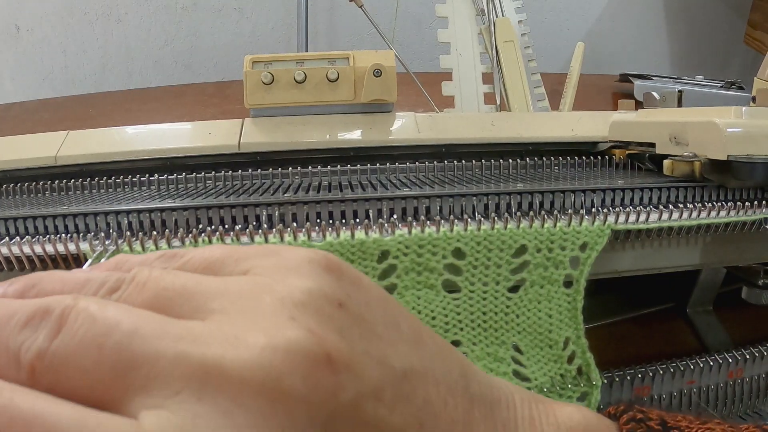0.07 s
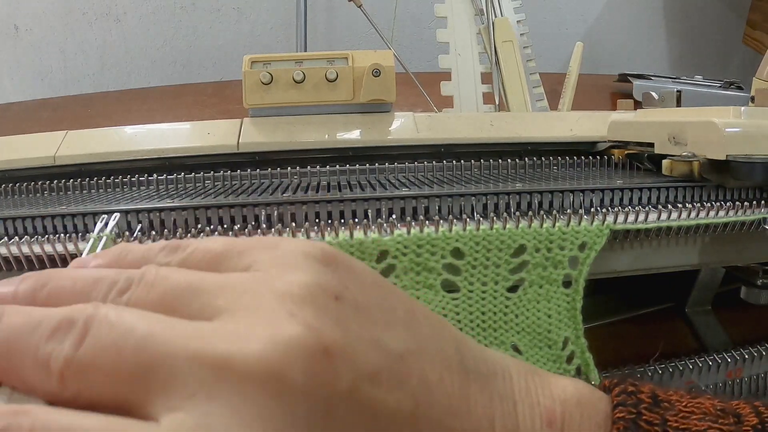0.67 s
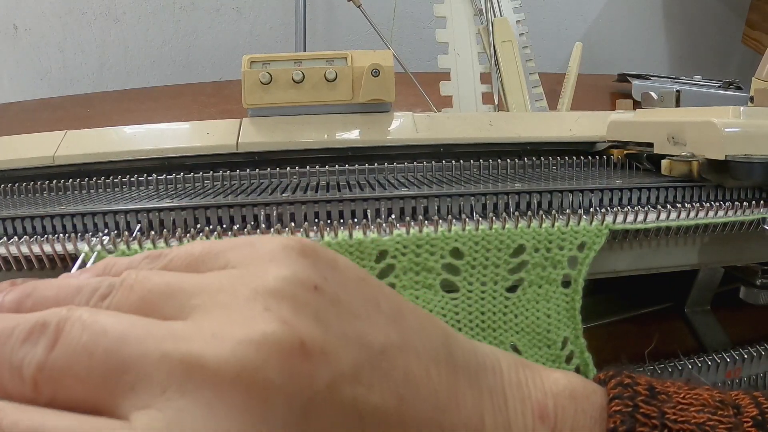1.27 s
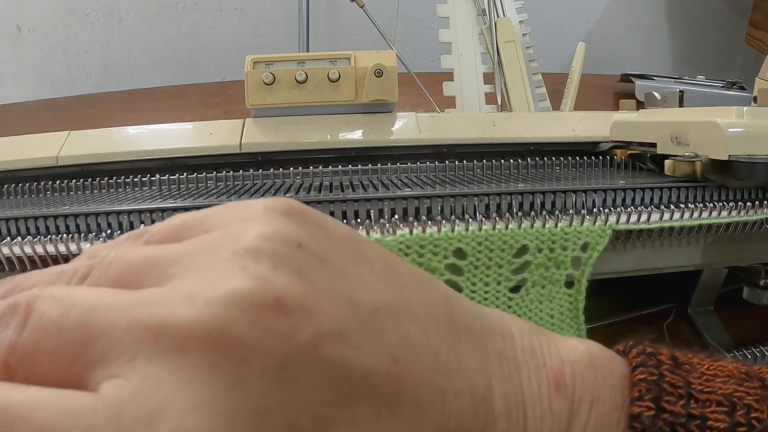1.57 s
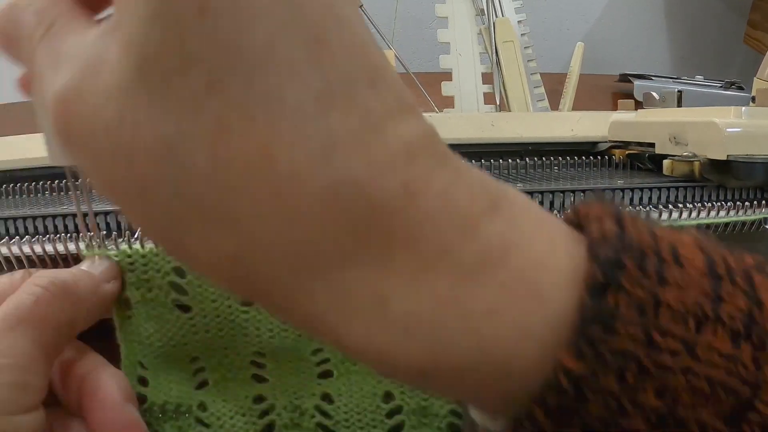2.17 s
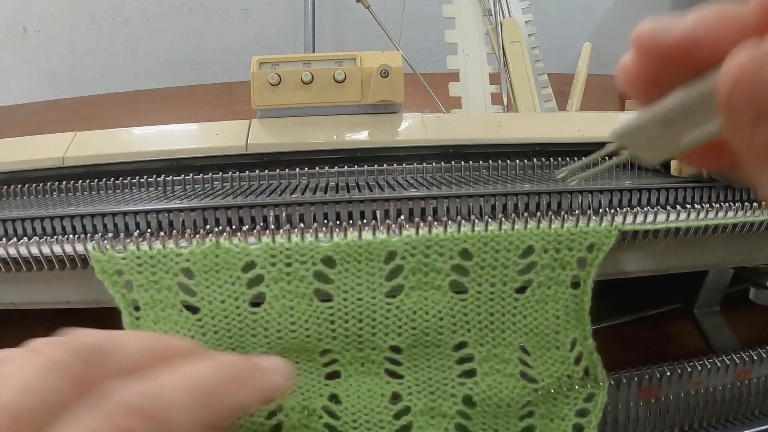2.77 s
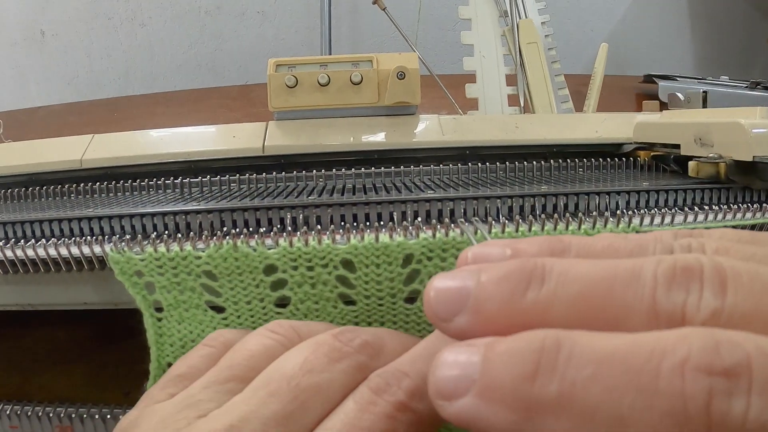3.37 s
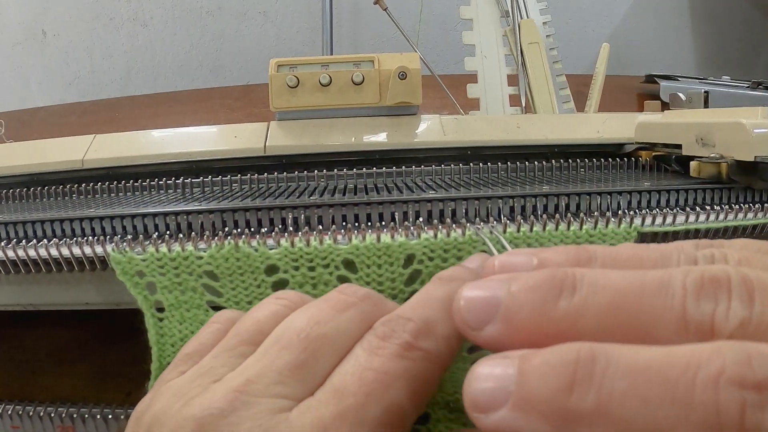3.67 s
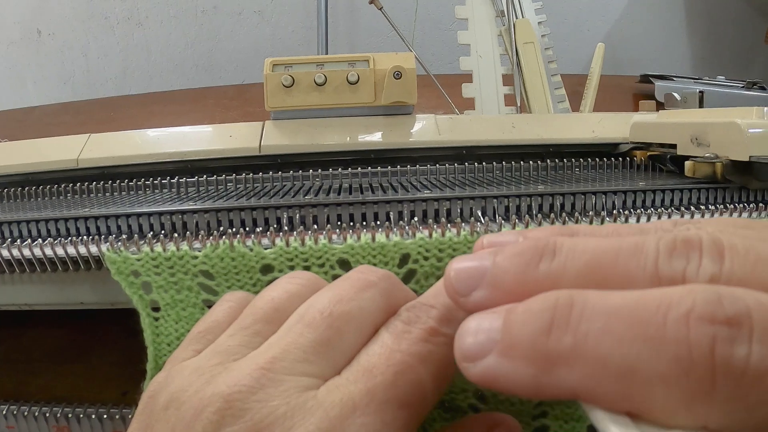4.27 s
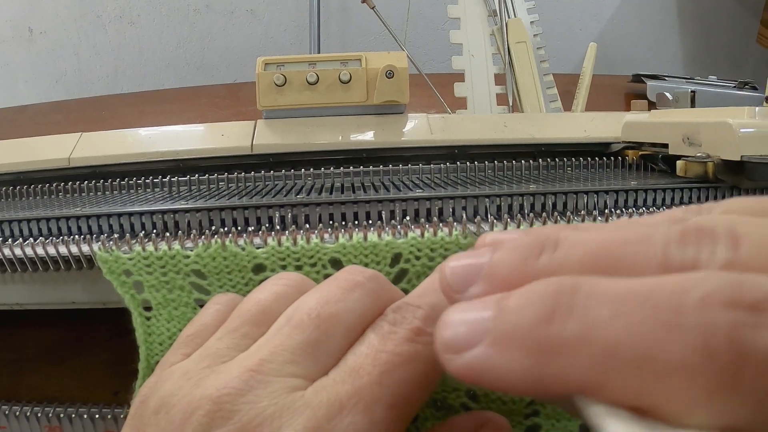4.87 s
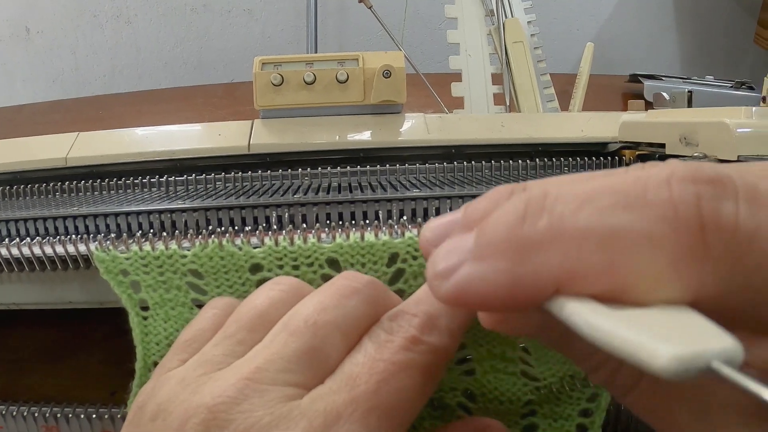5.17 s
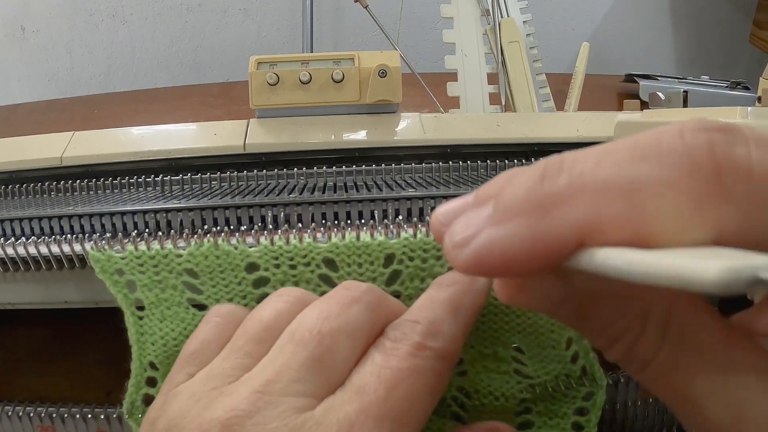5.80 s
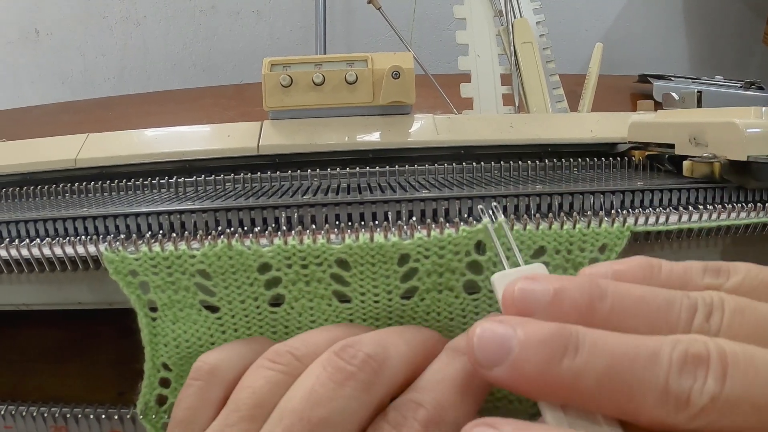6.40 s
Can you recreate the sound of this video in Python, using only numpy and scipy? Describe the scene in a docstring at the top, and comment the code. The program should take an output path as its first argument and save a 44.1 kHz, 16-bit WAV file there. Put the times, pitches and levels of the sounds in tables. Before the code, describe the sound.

Light, irregular metal clicks and ticks as a hand tool moves stitches on a knitting machine's needles, over a faint room hum.

```python
"""In a small quiet room, close to a stereo microphone, stitches are moved by hand on a flat-bed
knitting machine. Impacts excite free vibration: the transfer tool clicks against needles, latches flick
over, needles knock against their stops, and the steel bed rings briefly. In between, friction of yarn
and needle shanks makes a hiss, hands brush the knitting and bump the frame, and a low hum fills the room."""
import sys
import numpy as np
from scipy import signal
from scipy.fft import rfft, irfft, next_fast_len
from scipy.io import wavfile

SR = 44100
rng = np.random.default_rng(int(sys.argv[2]) if len(sys.argv) > 2 else 0)


def persist_wave(psi):
    """Save psi, clipped to +-1, as 16-bit WAV."""
    counts = np.round(np.clip(psi, -1, 1) * 32767).astype(np.int16)
    wavfile.write(sys.argv[1], SR, np.atleast_2d(counts).T)


N = 283915
TIME = np.arange(N) / SR

# spectrum of the room's air noise: f/Hz, gain/dB
AIR_SPECTRUM = [(20, -14.5), (45, -9.5), (70, -16), (105, -20), (150, -1.5), (190, 4), (260, -7),
                (420, -15.5), (780, -25.5), (1200, -17.5), (2000, -22.5), (2900, -32), (7500, -35),
                (9000, -45.5), (16000, -50)]
# partials of the hum: f/Hz, rms level/dB
HUM_PARTIALS = [(193.7, -71.5), (431, -85.5)]
# envelope of a low drone: t/s, level/dB
DRONE_ENVELOPE = [(0, -98), (2.1, -79), (2.8, -72), (4.1, -68), (4.5, -88.5), (5.5, -67), (6.44, -72.5)]
# hands bumping the machine: t/s, level/dB, f/Hz, T60/s
BUMPS = [(0.335,-54,42.4,.4), (0.495,-46.5,148,0.4), (1.891,-49.5,46,0.15), (2.389,-40.5,155.5,0.24),
         (2.663,-39,166,0.053), (3.418,-53.5,302,0.17), (4.836,-48.5,305,0.21), (5.216,-43,66,0.12),
         (5.296,-43,28.4,0.17)]
# hand and sleeve brushing the knitting: t/s, duration/s, level/dB
BRUSHES = [(.32, 0.084, -53.5), (2.13, 0.3, -70), (2.305, 0.049, -54.5), (2.385, 0.062, -49.5),
           (4.7, 0.058, -69.5), (5.04, 0.047, -59), (5.21, 0.055, -65.5)]
# spectrum of skin on wool: f/Hz, gain/dB
BRUSH_SPECTRUM = [(100, -23), (280, 9.5), (520, 10.5), (850, 5), (1500, 4), (2500, -15.5), (6000, -32),
                  (16000, -53)]
# needles pushed along their slots: t/s, duration/s, level/dB
SLIDES = [(0.078,0.054,-62), (0.278,.03,-63), (0.442,0.1,-65), (0.669,0.088,-64), (0.801,0.16,-71),
          (1.064,0.056,-54.5), (1.679,0.28,-68), (2.093,0.24,-68), (3.18,.11,-78.5), (4.15,.12,-68.5),
          (4.962,0.069,-57.5), (5.123,0.034,-54), (5.588,0.051,-64), (5.765,0.1,-59.5), (5.986,0.034,-55)]
# spectrum of sliding friction: f/Hz, gain/dB
RUB_SPECTRUM = [(150, -2.5), (400, -9.5), (750, -16.5), (1300, 1.5), (2000, -1), (3500, -2), (6000, 2),
                (7600, -1.5), (8800, -12.5), (13000, -19), (16000, -30)]
# needles slipping off the tool: t/s, level/dB, T60/s
PINGS = [(1.071,-57.5,0.44), (1.215,-71.5,0.6), (2.414,-47.5,0.27), (2.653,-77,0.82), (4.182,-65.5,0.54),
         (4.835,-46,0.4)]
# response of the needle bed: f/Hz, gain/dB
BED_SPECTRUM = [(150, -13), (300, -3.5), (500, -6), (780, -7.5), (1150, 3.5), (1550, -3.5), (1850, -9),
                (3300, -1.5), (4800, -7), (7400, -10), (8800, -14.5), (12400, -14.5), (16000, -26)]
# decay of the bed by band: f/Hz, T60/s
BED_DECAY = [(150, 0.96), (1100, 0.26), (3400, 0.29), (7000, 0.37), (15000, 0.061)]
# latches flicking over: t/s, relative level/dB
LATCHES = [(0.1057,-54.5), (0.7104,-48), (0.7268,-53.5), (0.8136,-56), (0.896,-57.5), (1.06,-42),
           (1.095,-50.5), (1.2161,-42.5), (1.3013,-47.5), (1.3694,-45.5), (1.7331,-46), (1.785,-42),
           (1.872,-45.5), (2.3082,-44), (4.158,-56), (4.786,-51.5)]
# needles hitting their stops: t/s, relative levels of clack/dB, low modes/dB and bed/dB, contact time/s
KNOCKS = [(0.516, -29.5, -33, -33.5, 0.0011), (0.6263, -35.5, -41, -40.5, 0.0031),
          (5.9717, -34, -35, -35.5, 0.0026), (6.1143, -33.5, -44.5, -34.5, 0.0022),
          (6.2345, -37, -42, -42, 0.003), (6.2424, -34.5, -61, -38, 0.0015)]
# spectrum of a needle on its stop: f/Hz, gain/dB
CLACK_SPECTRUM = [(300, -32.5), (1200, -33), (1900, -12), (2700, -2.5), (3400, 10), (4800, -4.5),
                  (7300, -2.5), (8800, -24.5), (12000, -12), (16000, -100)]
# low and high modes of the knocked bed: f/Hz, relative level/dB, T60/s
LOW_BED_MODES = [(1070, -8, 0.058), (1096, 23.5, 0.19), (1050, 18.5, 0.1), (1080, -14, 0.23),
                 (1230, 7, 0.26), (1360, -16, 0.15), (1594, 1, .14)]
HIGH_BED_MODES = [(2340, -4.5, 0.091), (2600, -4, 0.25), (2950, -10, 0.15), (3084, 12, 0.041),
                  (3255, -9, 0.42), (3305, 1.5, 0.2), (4000, -22, 0.072), (5706, -13, .2),
                  (7630, -42.5, 0.276)]
# tool striking needles: t/s, f/Hz, relative level/dB, share passed to the bed/dB, contact time/s
CLICKS = [(.0365,5860,-47,-11.5,0.0015), (0.3178,6280,-31,-5,0.0017), (.3418,6600,-32.5,-21,0.0028),
          (0.4185,6130,-48,-1.5,0.001), (.4301,4006,-37,2,0.0014), (.4728,6200,-26,-10,0.00088),
          (2.386,5790,-35,0,.0013), (2.3994,7520,-29.5,-23.5,0.00086), (2.412,5000,-28,-22,.001),
          (3.9735,4496,-47.5,-15.5,0.00099), (4.0367,6070,-42,-18,0.00045), (4.1843,5280,-39.5,-17,0.00043),
          (4.3,5470,-43,-5,0.0047), (4.4392,5460,-48,-9,0.0016), (4.644,5620,-45,-8,0.005),
          (4.8333,5270,-42,-4,0.0011), (5.028,5500,-46,4,0.0015), (5.0422,5520,-32,-7,0.002),
          (5.0673,3740,-46.5,-28,0.0031), (5.1587,3950,-50.5,2,0.00091), (5.211,5400,-43,-4.5,0.0012),
          (5.5207,6360,-52.5,4.5,0.0022), (5.6416,6040,-46.5,0.5,.0029), (5.763,6200,-49.5,-5,0.00025),
          (5.7893,4760,-49.5,0.5,.0023), (5.8422,3570,-54.5,7,.0011), (5.8794,4120,-29,-10.5,0.0033),
          (6.0773,4270,-53.5,-3,.003), (6.2083,3360,-43.5,-12,0.004)]
# spectrum of a sharp steel contact: f/Hz, gain/dB
CRACK_SPECTRUM = [(200, -5.5), (1000, -10), (2000, 1), (3500, 5), (7500, 7), (9000, -4.5), (12500, -3.5),
                  (15000, -5), (16500, -15.5)]
# where the tool works: t/s, left minus right level/dB, lag of the left side/ms
TOOL_PATH = [(0, -.8, 0), (1.3, -1.3, .01), (2.4, .3, .01), (3.4, -2.5, .05), (4.2, -5.5, .06),
             (5.1, -4, .06), (6.0, -2.5, .045), (6.44, -1.3, .045)]

CONTACT_S = .005  # impact levels are energy spread over this time
SIDE_DB = -8  # weak side signal: the bed lies in front of both microphones
CUTOFF_HZ = 16300


def from_db(db):
    """Amplitude ratio of a level in decibels."""
    return 10 ** (np.asarray(db) / 20)


def rms_one(x):
    """Normalisation to unit mean power."""
    return x / np.sqrt(np.mean(x ** 2) + 1e-20)


def at_level(x, db):
    """Equal energy: each channel matches a burst of this level lasting CONTACT_S."""
    return x * from_db(db) * np.sqrt(CONTACT_S * SR / (np.sum(x ** 2, axis=-1, keepdims=True) + 1e-20))


def at_hz(points, hz):
    """Interpolation on a logarithmic frequency axis."""
    f, value = np.transpose(points)
    return np.interp(np.log(np.maximum(hz, 1)), np.log(f), value)


def add(out, s, sound):
    """Superposition of a sound from time s."""
    i = max(int(round(s * SR)), 0)
    out[..., i:i + sound.shape[-1]] += sound[..., :N - i]


def colour(x, spectrum, ripple_db=0, spacing_hz=100):
    """Minimum-phase filtering; random ripple stands for the peaks and gaps of a body's many modes."""
    size = next_fast_len(x.shape[-1] + 2048, real=True)
    hz = np.arange(size // 2 + 1) * SR / size
    ripple = np.interp(hz / spacing_hz, np.arange(1024), rng.standard_normal(1024))
    gain = from_db(at_hz(spectrum, hz) + ripple_db * np.clip(ripple, -2, 2))
    cepstrum = irfft(np.log(gain), size)
    cepstrum[1:size // 2] *= 2  # folding makes the filter causal
    cepstrum[size // 2 + 1:] = 0
    return irfft(rfft(x, size) * np.exp(rfft(cepstrum)), size)[..., :x.shape[-1]]


def resonate(x, hz, *widths_hz):
    """Damped resonators in series, one per bandwidth, each with unit peak gain."""
    for width_hz in widths_hz:
        r = np.exp(-np.pi * width_hz / SR)
        feedback = [1, -2 * r * np.cos(2 * np.pi * hz / SR), r * r]
        x = signal.lfilter(np.array([1, 0, -1]) * (1 - r * r) / 2, feedback, x + 1e-18)
    return x


def stereo_noise(size, side_db):
    """Partial coherence: a shared noise plus one of opposite sign on the two sides."""
    mid, side = rng.standard_normal((2, size))
    return rms_one(mid + from_db(side_db) * side * [[1], [-1]])


def drift(rate_hz):
    """Slow random modulation of unit rms."""
    knots = rng.standard_normal(8192)
    return rms_one(np.interp(TIME * rate_hz, np.arange(len(knots)), knots))


def strokes(table):
    """Amplitude envelope that rises and falls smoothly in each stroke."""
    envelope = np.zeros(N)
    for s, length_s, db in table:
        add(envelope, s, from_db(db) * signal.windows.tukey(max(int(length_s * SR), 2), .5))
    return envelope


def contact(length_s, side_db, size=1536):
    """Contact chatter of steel on steel: a rough burst that swells and dies within milliseconds."""
    t = TIME[:size] / max(length_s, 1e-4)
    return stereo_noise(size, side_db) * t * np.exp(-1.7 * t)


def ring(modes, spread_rad, size):
    """Free vibration: a sum of decaying modes whose strengths and phases vary from blow to blow."""
    t, out = TIME[:size], 0
    for hz, db, t60 in modes:
        phase = 2 * np.pi * rng.random() + spread_rad * rng.standard_normal((2, 1))
        envelope = from_db(db + rng.normal(0, 2.3) - 60 * t / t60)
        out = out + envelope * np.sin(2 * np.pi * hz * t + phase)
    return out * (1 - np.exp(-t / 0.00059))


def room_tone(low_db, high_db, split_hz, drone_hz):
    """Ambient noise: steady broadband air, a modulated hum and a narrowband drone that comes and goes."""
    low = signal.sosfilt(signal.butter(2, split_hz, fs=SR, output="sos"), stereo_noise(N, -3.5))
    high = signal.sosfilt(signal.butter(2, split_hz, "high", fs=SR, output="sos"), stereo_noise(N, 0))
    air = from_db(low_db) * rms_one(colour(low, AIR_SPECTRUM))
    air += from_db(high_db) * rms_one(colour(high, AIR_SPECTRUM))
    hum = sum(from_db(db + 2 * drift(1.7)) * np.sin(2 * np.pi * hz * TIME + .5 * drift(5.8))
              for hz, db in HUM_PARTIALS)
    drone = rms_one(resonate(stereo_noise(N, side_db=-3), drone_hz, 22, 45))
    return air + np.sqrt(2) * hum + from_db(np.interp(TIME, *np.transpose(DRONE_ENVELOPE))) * drone


def bumps(spread_rad, roughness, size=16384):
    """Damped low modes of frame and table thud, reaching the two sides with a phase difference."""
    out, t = np.zeros((2, N)), TIME[:size]
    for s, db, hz, t60 in BUMPS:
        tone = np.sin(2 * np.pi * hz * t + spread_rad * np.array([[.5], [-.5]]))
        rumble = rms_one(resonate(stereo_noise(size, side_db=-3), hz, hz / 2))
        envelope = from_db(db - 60 * t / t60) * (1 - np.exp(-t * hz * 2))
        add(out, s, envelope * (tone + roughness * rumble))
    return out


def brushes():
    """Soft friction of skin and wool gives a dull rustle."""
    return strokes(BRUSHES) * rms_one(colour(stereo_noise(N, side_db=-12), BRUSH_SPECTRUM))


def slides(grains_per_s, grain_db, hiss_db, idle_db, lead_db, lead_s):
    """Sliding friction is a stream of tiny catches over a soft hiss."""
    # a faint, brief hiss leads into each click, tick and knock
    lead_ins = [(s - 0.78 * lead_s, lead_s, db + lead_db) for s, _, db, *_ in CLICKS]
    lead_ins += [(s - 0.55 * lead_s, lead_s, db + lead_db) for s, db, *_ in LATCHES + KNOCKS]
    # the tool rubs around each click, as hard as it bears on the bed
    rubs = [(s - 0.011, 0.046, db + share_db - 15) for s, _, db, share_db, _ in CLICKS]
    envelope = from_db(idle_db) + strokes(SLIDES + rubs + lead_ins)
    grains = (rng.random(N) < grains_per_s / SR) * from_db(grain_db * np.minimum(rng.exponential(1, N), 3))
    friction = rms_one(grains * stereo_noise(N, side_db=2))
    friction += from_db(hiss_db) * stereo_noise(N, side_db=-7)
    return envelope * rms_one(colour(friction, RUB_SPECTRUM))


def pings(hz, beat_hz, overtone_ratio, overtone_db):
    """A freed needle, damped by yarn, beats in two close bending modes under a faint higher one."""
    out = np.zeros((2, N))
    for s, db, t60 in PINGS:
        modes = [(hz, 0, t60), (hz + beat_hz, -4, t60 / 2), (hz * overtone_ratio, overtone_db, t60 / 2)]
        add(out, s, from_db(db) * ring(modes, spread_rad=.4, size=32768))
    return out


def bed_ring(early_db, early_s, size=14336):
    """Dense modes of bed and room decay like noise: a quick early fall, then a tail dying band by band."""
    t, tail = TIME[:size], 0
    spectrum = rfft(stereo_noise(size, SIDE_DB))
    hz = np.arange(size // 2 + 1) * SR / size
    centres, decays = np.transpose(BED_DECAY)
    for weights, t60 in zip(np.eye(len(centres)), decays):
        band = irfft(spectrum * at_hz(np.c_[centres, weights], hz) * (hz > 100))
        tail = tail + band * from_db(-60 * t / t60)
    envelope = (1 + from_db(early_db) * np.exp(-t / early_s)) * (1 - np.exp(-t / 0.0003))
    return colour(tail * envelope, BED_SPECTRUM, ripple_db=3.5, spacing_hz=75)


def bed_clusters(modes, relative_width, size=14336):
    """Mode splitting: the coupled needles turn each mode of the bed into a narrow, beating cluster."""
    t, shake, out = TIME[:size], stereo_noise(size, SIDE_DB), 0
    for hz, db, t60 in modes:
        cluster = rms_one(resonate(shake, hz, relative_width * hz, 3 * relative_width * hz))
        out = out + cluster * from_db(db + rng.normal(0, 0.91) - 60 * t / t60)
    return out


def trembles(from_s, to_s, per_s, hz, db):
    """Loose latches rattle at random while stitches are lifted: rows of t/s, f/Hz, relative level/dB."""
    moments = np.arange(from_s, to_s, 1 / per_s)
    return [(s + jitter / per_s / 2, hz * np.exp(0.12 * pitch), db + 4.5 * force)
            for s, (jitter, pitch, force) in zip(moments, rng.standard_normal((64, 3)))]


def latches(ring_hz, width_hz, ring_db, upper_hz, upper_db, crack_db, bed_db):
    """Impulse response: a latch snaps shut into a heavily damped ring, then rebounds once, faintly."""
    out, blow = np.zeros((2, N)), signal.unit_impulse(1536)
    # the latches are alike, so their pitch spreads little
    flicks = [(s, ring_hz * np.exp(.03 * rng.standard_normal()), db) for s, db in LATCHES]
    rebounds = [(s + .025 * rng.uniform(.7, 2.1), hz * 1.11, db - 19.5) for s, hz, db in flicks]
    for s, hz, db in flicks + rebounds + trembles(from_s=.8, to_s=2.5, per_s=5.5, hz=6700, db=-66):
        tick = at_level(resonate(blow, hz, width_hz, 0.28 * width_hz), db + ring_db)
        upper = at_level(resonate(blow, upper_hz, width_hz, width_hz), db + upper_db)
        crack = at_level(colour(contact(0.0043, side_db=0), CRACK_SPECTRUM), db + crack_db)
        add(out, s, tick + upper + crack)
        add(out, s, at_level(bed_ring(early_db=4.5, early_s=0.0041), db + bed_db))
    return out


def knocks(clack_db, low_db, high_db, bed_db, bounce_s, bounce_db):
    """Inelastic impact: a needle butt hits its stop, bounces once and excites the bed's main modes."""
    out = np.zeros((2, N))
    for s, clack_level, low_level, bed_level, length_s in KNOCKS:
        for delay_s, db in [(0, clack_db), (bounce_s, clack_db + bounce_db)]:
            clack = colour(contact(length_s, SIDE_DB), CLACK_SPECTRUM, ripple_db=8, spacing_hz=285)
            add(out, s + delay_s, at_level(clack, clack_level + db))
        add(out, s, at_level(bed_clusters(LOW_BED_MODES, relative_width=0.084), low_level + low_db))
        add(out, s, at_level(bed_clusters(HIGH_BED_MODES, relative_width=0.056), bed_level + high_db))
        add(out, s, at_level(bed_ring(early_db=0.5, early_s=0.019), bed_level + bed_db))
    return out


def skim(start_s=3.4155, step_s=.0765, hz=4230, db=-56.5, loss_db=1.6, share_db=-2, contact_s=.001):
    """Periodic impacts, each weaker, as the tool skims five needles: rows as in CLICKS."""
    return [(start_s + k * step_s, hz, db - k * loss_db, share_db, contact_s) for k in range(5)]


def catches(per_s=20, hz=5300, share_db=-11, contact_s=.0007):
    """Random impacts as the sliding tool catches on needles: rows as in CLICKS."""
    rows = []
    for s, length_s, db in SLIDES:
        when = rng.random(16)
        pitch, force = np.clip(rng.standard_normal((2, 16)), -2, 2)
        for k in range(min(round(per_s * length_s), len(when))):
            catch_db = db + 1.5 + 1.5 * force[k]
            rows.append((s + when[k] * length_s, hz * np.exp(.2 * pitch[k]), catch_db, share_db, contact_s))
    return rows


def steel_modes(centre_hz, scatter, t60, count):
    """Each needle has its own thin, high natural modes, scattered round its main ring."""
    pitches = np.minimum(centre_hz * np.exp(scatter * rng.standard_normal(count)), CUTOFF_HZ)
    return [(hz, db, t60) for hz, db in zip(pitches, rng.normal(0, 3, count))]


def clicks(width_hz, ring_db, prong_hz, prong_db, crack_db, crack_growth, bed_db, steel_db):
    """Impact of tool on needle: a crack that grows with force, and resonance of needle, prong and bed."""
    out, hardest_db = np.zeros((2, N)), max(row[2] for row in CLICKS)
    for s, hz, db, share_db, length_s in CLICKS + skim() + catches():
        needle = resonate(contact(length_s, side_db=-8.5), hz, width_hz, 3 * width_hz)
        prong = resonate(contact(length_s, side_db=-7.5), prong_hz, 530, 1500)
        crack = colour(contact(length_s, side_db=-1.5), CRACK_SPECTRUM, ripple_db=2.5, spacing_hz=425.4)
        steel = ring(steel_modes(1.09 * hz, scatter=0.13, t60=0.15, count=20), spread_rad=1, size=6144)
        add(out, s, at_level(needle, db + ring_db) + at_level(prong, db + prong_db))
        # the harder the tool bears on the bed, the less it cracks and the more the steel rings
        add(out, s, at_level(crack, db + crack_db + crack_growth * (db - hardest_db) - .25 * share_db))
        add(out, s, at_level(steel, db + steel_db + 0.47 * share_db))
        add(out, s, at_level(bed_ring(early_db=2.5, early_s=0.0048), db + share_db + bed_db))
    return out


def place(x):
    """Level and arrival-time differences between the sides follow the work along the bed."""
    s, pan_db, lag_ms = np.transpose(TOOL_PATH)
    pan = np.interp(TIME, s, pan_db)
    lag = np.round(np.interp(TIME, s, lag_ms) * SR / 1000)
    left = np.interp(np.arange(N) - lag, np.arange(N), x[0])
    return np.array([left * from_db(pan / 2), x[1] * from_db(-pan / 2)])


def scene():
    """Superposition of the handwork and the tone of the room."""
    work = latches(ring_hz=5730, width_hz=1060, ring_db=1.5, upper_hz=7740, upper_db=-11,
                   crack_db=-8, bed_db=-12.5)
    work += clicks(width_hz=700, ring_db=2, prong_hz=7470, prong_db=-5.5,
                   crack_db=-4.5, crack_growth=.25, bed_db=1.42, steel_db=-5)
    work += knocks(clack_db=3.3, low_db=-0.5, high_db=-2, bed_db=-5.1, bounce_s=0.0096, bounce_db=-15.5)
    work += slides(grains_per_s=630, grain_db=4.5, hiss_db=-2, idle_db=-84, lead_db=-20, lead_s=0.0083)
    work += pings(hz=4390, beat_hz=54.65, overtone_ratio=2.69, overtone_db=-15.5)
    work += brushes()
    thuds = bumps(spread_rad=0.89, roughness=0.51)
    room = room_tone(low_db=-61.5, high_db=-74, split_hz=1580, drone_hz=64.75)
    return place(work) + thuds + room


def record(dry):
    """Band limiting: a steep low-pass filter removes the highest treble."""
    return signal.sosfilt(signal.ellip(10, .2, 70, CUTOFF_HZ, fs=SR, output="sos"), dry)


dry = scene()
out = record(dry)
persist_wave(out)
```